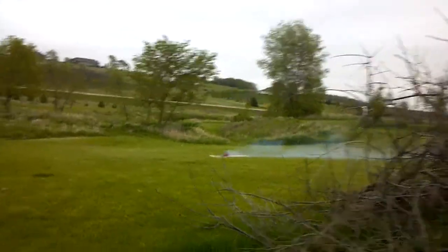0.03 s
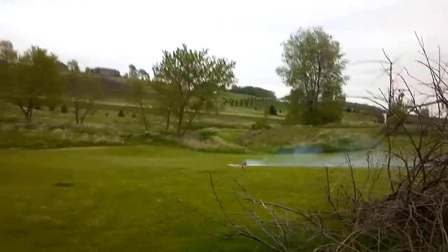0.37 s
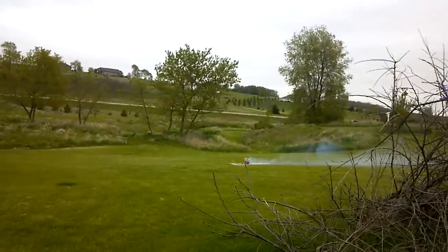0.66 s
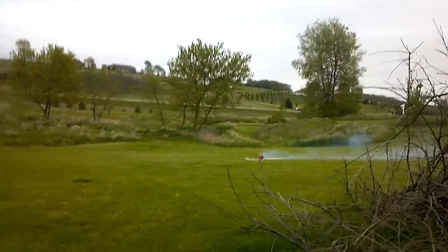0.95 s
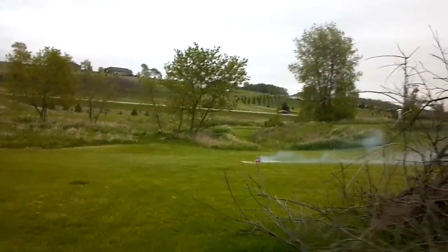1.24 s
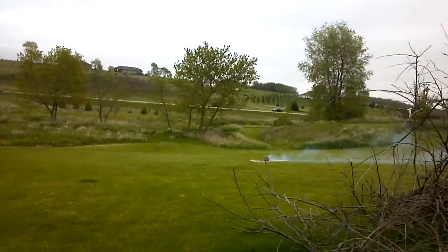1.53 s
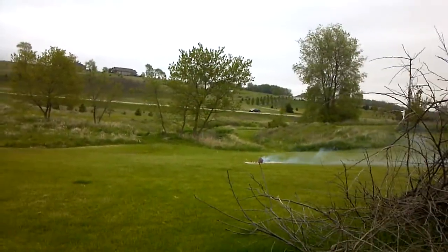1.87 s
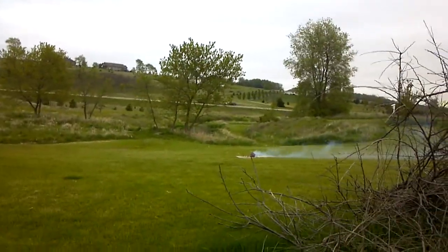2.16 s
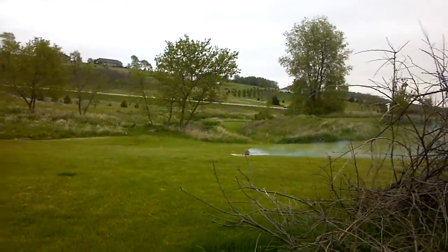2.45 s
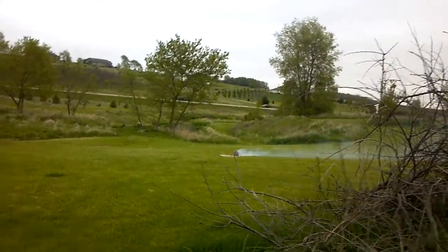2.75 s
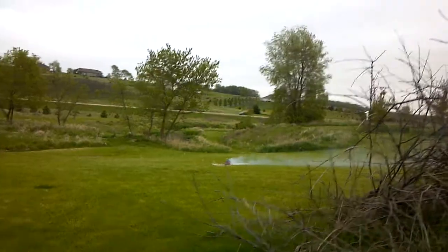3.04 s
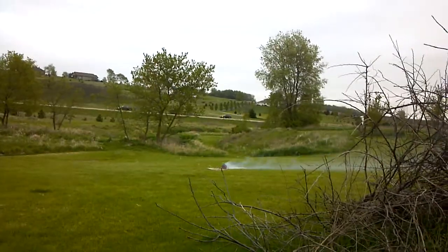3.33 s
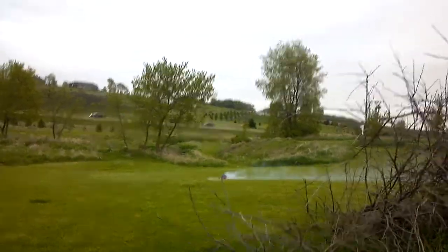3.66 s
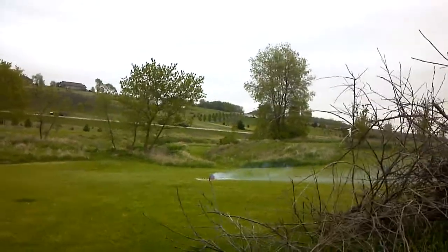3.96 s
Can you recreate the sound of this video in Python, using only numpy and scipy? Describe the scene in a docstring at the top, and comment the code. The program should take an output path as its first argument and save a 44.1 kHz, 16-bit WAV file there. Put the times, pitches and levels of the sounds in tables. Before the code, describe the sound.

Wind buffets the microphone outdoors with low, fluttering thumps throughout. Far behind it a jet of smoke hisses thinly and a bird gives one short trill; later come faint peeps, softly rushing trees and a few close, dry ticks.

```python
"""On a lawn, a smoking canister hisses far off while gusty wind rumbles and thumps on the microphone.
The hiss is the jet of smoke, and each thump is an eddy (a small swirl of air) hitting the microphone.
The breeze rises in the trees, a distant bird trills once, another peeps faintly, and a few dry ticks
sound close by. The left channel is flipped upside down and sits a fraction of a millisecond apart
from the right, so the sound is very wide."""
import sys
import numpy as np
from scipy import signal
from scipy.fft import rfft, irfft, next_fast_len
from scipy.io import wavfile
from scipy.ndimage import uniform_filter1d, map_coordinates

SR = 44100
rng = np.random.default_rng(int(sys.argv[2]) if len(sys.argv) > 2 else 0)


def dump_mix(stems):
    """Bounce the given channels to the path in sys.argv[1] as a 16-bit WAV at rate SR."""
    frames = np.atleast_2d(stems).T  # one column per channel
    limited = np.clip(frames, -1, 1)  # hard clip at full scale
    pcm = np.round(limited * 32767).astype(np.int16)
    wavfile.write(sys.argv[1], SR, pcm)


N = 176400
T = np.arange(N) / SR

# How strong the wind is at the microphone (time [s], relative level [dB])
WIND_LEVEL = [(0, -28.5), (.43, -19.5), (.7, -24), (.85, -21.5), (.97, -28), (1.27, -25), (1.4, -33),
              (1.66, -23), (1.9, -25), (2.36, -23), (2.52, -21), (2.89, -18), (3.05, -20.5), (3.4, -19),
              (3.55, -21), (4, -24)]
# Big eddies hitting the microphone (time [s], relative thump level [dB], relative edge level [dB])
BIG_EDDIES = [(.188, -18, -20), (.201, -22, -50), (.289, -11.5, -21.5), (.319, -12, -24),
              (.345, -25, -17.5), (.401, -18, -26), (.421, -11, -15), (.432, -12, -12.5),
              (.542, -10, -17.5), (.558, -9, -29), (.579, -18, -11.5), (.628, -18.5, -20.5),
              (.777, -12.5, -28), (1.146, -10, -24.5), (1.293, -16.5, -44), (1.652, -14.5, -31),
              (1.709, -16.5, -21.5), (1.762, -14, -37), (2.105, -8, -18), (2.127, -18, -22), (2.2, -9, -21),
              (2.251, -16.5, -21.5), (2.301, -14, -26), (2.364, -26, -17), (2.39, -12.5, -22),
              (2.432, -9, -17.5), (2.708, -14, -47), (2.758, -17, -22), (2.775, -7.5, -14.5),
              (2.814, -10, -21.5), (2.828, -29, -13), (2.839, -11, -18), (2.876, -15, -17.5),
              (2.893, -9.5, -19), (2.939, -26, -22.5), (2.968, -14, -24), (3.282, -12.5, -53),
              (3.372, -18, -18.5), (3.385, -15, -17), (3.409, -11, -26), (3.473, -25, -17),
              (3.646, -18, -18), (3.721, -11, -25.5), (3.735, -27, -17), (3.815, -16, -19),
              (3.881, -23, -38), (3.943, -11.5, -19)]
# How loud the trees, the lower hiss and its bright fizz are (time [s], relative level [dB])
TREE_LEVEL = [(0, -52), (1.02, -51), (1.26, -45.5), (1.65, -44.5), (1.76, -40), (2.11, -38), (2.18, -44.5),
              (2.8, -38), (3.6, -40.5), (4, -40)]
HISS_LEVEL = [(0, -51), (.37, -46), (.46, -51), (.81, -48.5), (1.27, -56), (2.1, -55), (2.57, -58),
              (3.65, -57), (3.99, -52)]
FIZZ_LEVEL = [(0, -42.5), (.28, -42.5), (.7, -53), (.76, -41), (1.08, -44.5), (1.26, -52), (1.73, -45.5),
              (2.0, -47.5), (2.38, -44), (2.61, -45.5), (2.9, -50.5), (3.1, -49), (3.48, -51.5),
              (3.68, -47.5), (3.78, -51), (3.96, -45)]
# The second bird's peeps (time [s], level [dB], pitch [Hz])
BIRD_PEEPS = [(1.37, -51, 4180), (3.66, -53, 4600), (3.88, -50, 4420)]
# Ticks close by (time [s], starting level [dB], time to fade by 60 dB [s], treble limit [Hz])
DRY_TICKS = [(2.646, -20, .022, 3300), (2.742, -24, .016, 2800), (2.754, -20, .028, 2750),
             (2.959, -31, .045, 4600), (3.067, -29, .035, 2900)]
# The tone of each noise, from bass to treble (frequency [Hz], relative level [dB])
RUMBLE_TONE = [(25, -54), (60, -9.5), (100, 3.5), (140, 1.5), (240, -9), (600, -35), (4000, -95)]
THUMP_TONE = [(70, -26.5), (140, 5.5), (230, 0), (380, -13.5), (600, -41), (1500, -63.5)]
EDGE_TONE = [(200, -1.5), (370, 10), (520, 1.5), (700, -11), (1100, -20.5), (3500, -62)]
TREE_TONE = [(200, -1.5), (600, -0.5), (1050, 3.5), (1500, 1.5), (2000, 0), (2500, -7.5), (3400, -13),
             (10000, -43)]
HISS_TONE = [(600, -48), (3300, 3.5), (4500, 7.5), (7000, 3), (9000, -8.5), (15000, -33)]
FIZZ_TONE = [(3000, -58), (6500, -2.5), (8500, 1), (10000, 4.5), (12500, 1), (14000, -2), (15800, -8.5)]
TICK_TONE = [(500, -18), (1400, -9), (2000, 0), (3500, -9), (12000, -32)]
# How the two channels compare in sensitivity (frequency [Hz], left minus right [dB])
CHANNEL_BALANCE = [(100, -3.5), (500, -4), (1000, 1), (2100, -6), (3000, 0.5), (10000, -2.5)]


def amp(db):
    """Turn decibels into a number to multiply by."""
    return 10 ** (np.asarray(db) / 20)


def unit(x):
    """Scale a signal so that its average power is 1."""
    return x / np.sqrt(np.mean(x ** 2) + 1e-20)


def along(points, hz):
    """Read between the rows of a frequency table, giving each octave equal room."""
    frequencies, values = np.transpose(points)
    return np.interp(np.log(hz + 1), np.log(frequencies + 1), values)


def curve(rows):
    """Join (time, value) rows with straight lines, one value per sample."""
    return np.interp(T, *np.transpose(rows))


def wobble(per_s):
    """A smooth curve through per_s random values each second."""
    return map_coordinates(rng.standard_normal(1024), [T * per_s], mode="wrap")


def filtered(x, response):
    """Scale and shift each frequency in x by response(hz)."""
    size = next_fast_len(N + SR // 4)
    return irfft(rfft(x, size) * response(np.fft.rfftfreq(size, 1 / SR)), size)[..., :N]


def noise(tone, patchy_db, apart_db=-12):
    """Stereo noise with drifting loud and soft patches; apart_db sets each channel's unshared part."""
    white = rng.standard_normal(N) + amp(apart_db) * rng.standard_normal((2, N))
    grid = signal.stft(white, nperseg=512)[2]  # channel, frequency, time
    patches = uniform_filter1d(rng.standard_normal(grid.shape[1:]), size=7, axis=0)
    patches = unit(uniform_filter1d(patches, size=20, axis=1))
    patchy = signal.istft(grid * amp(patchy_db * patches), nperseg=512)[1][:, :N]
    return unit(filtered(patchy, lambda hz: amp(along(tone, hz))))


def puffs(times, levels_db, tone, length_s):
    """A short, bell-shaped swell of evened-out noise at each time."""
    air = noise(tone, patchy_db=1.5, apart_db=-22)
    power = uniform_filter1d(np.mean(air ** 2, axis=0), size=350)
    even_air = air / np.sqrt(np.abs(power) + 1e-4)
    samples = np.clip(times * SR, 0, N - 1).astype(int)
    hits = np.bincount(samples, amp(levels_db) ** 2, N)
    bell = .5 ** ((2 * np.arange(-SR // 20, SR // 20) / SR / length_s) ** 2)
    return even_air * np.sqrt(np.abs(signal.fftconvolve(hits, bell, "same")))


def wind_rumble():
    """Churning air on the microphone makes a low rumble that follows the wind's strength."""
    churn = amp(1.6 * wobble(38)) * noise(RUMBLE_TONE, patchy_db=-0.5, apart_db=-19)
    return amp(curve(WIND_LEVEL) - 4) * unit(churn)


def wind_eddies():
    """Each eddy hits as a low thump with a rough edge; small ones flutter between the big ones."""
    small_per_s, scatter_db, edge_growth = 38, 3.5, 1.69
    jitter, strength, roughness = np.minimum(rng.standard_normal((400, 3)), 1.1).T
    small_times = (np.arange(len(jitter)) + 0.24 * jitter) / small_per_s
    mean_db = curve(WIND_LEVEL).mean()
    swing_db = np.interp(small_times, *np.transpose(WIND_LEVEL)) - mean_db + scatter_db * strength
    small_thump_db = mean_db + 0.5 + swing_db
    small_edge_db = mean_db - 9.5 + edge_growth * swing_db + 2 * roughness  # rougher in strong wind
    small_eddies = np.column_stack([small_times, small_thump_db, small_edge_db])
    times, thump_db, edge_db = np.vstack([BIG_EDDIES, small_eddies[small_times < T[-1]]]).T
    thumps = puffs(times, thump_db, THUMP_TONE, length_s=0.0086)
    edges = puffs(times, edge_db, EDGE_TONE, length_s=0.0061)
    return amp(-1.5) * (thumps + edges)


def trees():
    """The breeze rushes through the trees around the lawn."""
    return amp(curve(TREE_LEVEL) + 0.55 * wobble(19)) * noise(TREE_TONE, patchy_db=1.5)


def smoke_jet():
    """The jet hisses, and its sound wavers in the moving air, the bright fizz most of all."""
    waver_db = wobble(21.88)
    hiss = amp(curve(HISS_LEVEL) + 0.5 + .7 * waver_db) * noise(HISS_TONE, patchy_db=1.2)
    fizz = amp(curve(FIZZ_LEVEL) + 0.83 * waver_db + wobble(20)) * noise(FIZZ_TONE, patchy_db=2.5)
    # One thin, shrill band of the hiss swells and fades.
    shrill_hz, spread_hz, peak_s, swell_s = 9850, 220, 1.9, 0.46
    band = filtered(rng.standard_normal(N), lambda hz: 1 / (1 + ((hz - shrill_hz) / spread_hz) ** 2))
    swell = np.exp(-((T - peak_s) / swell_s) ** 2)
    return hiss + fizz + amp(-52.5 + waver_db) * swell * unit(band)


def bird_trill():
    """A clear note breaks into a quickening, fading buzz of chirps, blurred by echoes from the field."""
    note_s, buzz_s, end_s, echo_s = .563, .597, 1.2, .2
    note_hz, fall_hz, chirps_per_s, speedup_per_s2 = 2780, 520, 57, 26
    note_db, buzz_db, fade_db_per_s = -39.5, -43.5, 8
    gate = lambda start, end: np.clip(np.minimum(T - start, end - T) / 0.003, 0, 1)
    age = np.maximum(T - buzz_s, 0)
    # During each chirp, cycle runs from 0 to 1 and the pitch falls back to the note.
    cycle = (chirps_per_s * age + speedup_per_s2 * age ** 2 / 2 + 0.14 * wobble(35)) % 1
    hz = note_hz + 18 * wobble(120) + fall_hz * (T > buzz_s) * np.maximum(1 - 2 * cycle, 0)
    pulses = np.abs(np.sin(np.pi * cycle)) ** .5
    chirps = pulses * amp(buzz_db - fade_db_per_s * age + 1.5 * wobble(60))
    level = amp(note_db) * gate(note_s, buzz_s) + chirps * gate(buzz_s, end_s)
    song = level * np.sin(2 * np.pi * np.cumsum(hz) / SR)
    tail = rng.standard_normal(N) * amp(-60 * T / echo_s)
    echoes = signal.fftconvolve(song, tail / np.linalg.norm(tail))[:N]
    return song + amp(-7) * echoes


def bird_peeps():
    """A second bird's faint peeps each swell and fade on a short, shaky upward slide."""
    rise_hz_per_s, swell_s = 7800, 0.016
    shake = 1.2 * wobble(400)
    peeps = np.zeros(N)
    for peak_s, db, hz in BIRD_PEEPS:
        t = T - peak_s
        swell = np.exp(-np.minimum((t / swell_s) ** 2, 20))
        peeps += amp(db) * swell * np.sin(2 * np.pi * t * (hz + rise_hz_per_s * t / 2) + shake)
    return peeps


def dry_ticks():
    """Short bursts of noise, like twigs or a hand on the casing, some duller than others."""
    crack = noise(TICK_TONE, patchy_db=1)
    ticks = np.zeros((2, N))
    for start_s, db, fade_s, top_hz in DRY_TICKS:
        level = (T >= start_s) * amp(db - 60 * np.maximum(T - start_s, 0) / fade_s)
        ticks += level * filtered(crack, lambda hz: 1 / (1 + (hz / top_hz) ** 10))
    return ticks


def widen(pair, left_lead_ms):
    """Flip the left channel and move it ahead of the right (behind, if the lead is negative)."""
    half_shift = lambda hz: np.exp(1j * np.pi * hz * left_lead_ms / 1000)
    return filtered(pair, lambda hz: np.array([-half_shift(hz), 1 / half_shift(hz)]))


def scene():
    """Mix the wind on the microphone with the sounds that arrive through the air."""
    wind = wind_rumble() + wind_eddies()
    lawn = trees() + smoke_jet() + bird_trill() + bird_peeps() + dry_ticks()
    return widen(wind, left_lead_ms=-0.38) + widen(lawn, left_lead_ms=0.3629)


def record(dry):
    """The right channel is more sensitive at most frequencies, and the highest treble is cut off."""
    top_hz = 15800
    sides = np.array([[.5], [-.5]])  # each channel takes half of the balance
    return filtered(dry, lambda hz: amp(along(CHANNEL_BALANCE, hz) * sides) * (hz < top_hz))


dry = scene()
out = record(dry)
dump_mix(out)
```